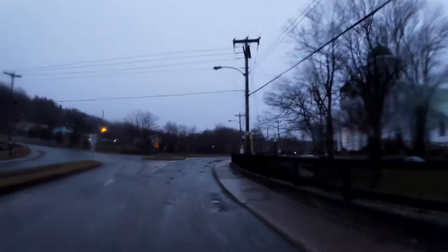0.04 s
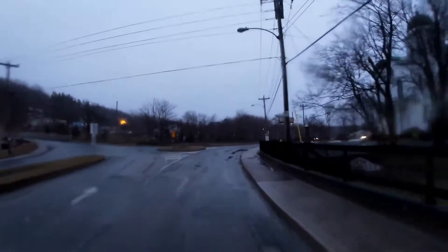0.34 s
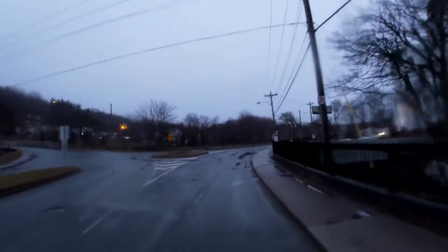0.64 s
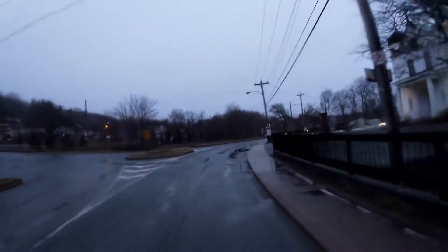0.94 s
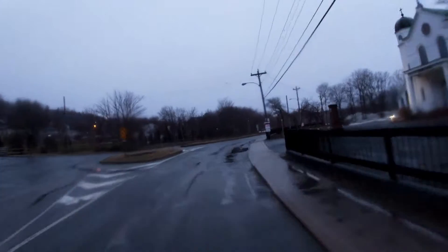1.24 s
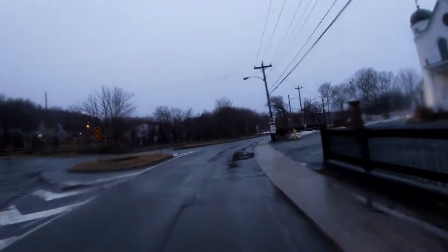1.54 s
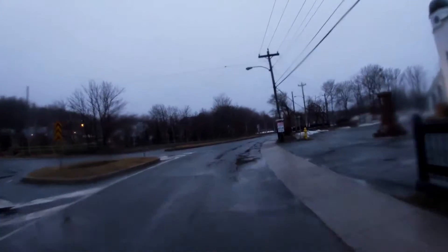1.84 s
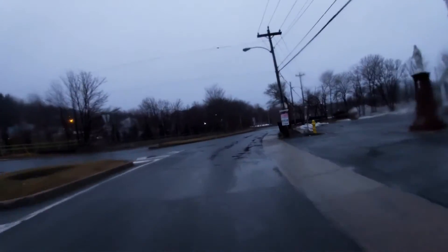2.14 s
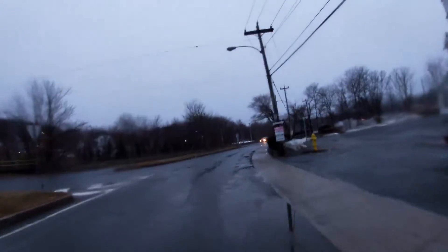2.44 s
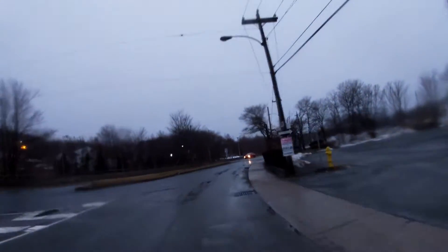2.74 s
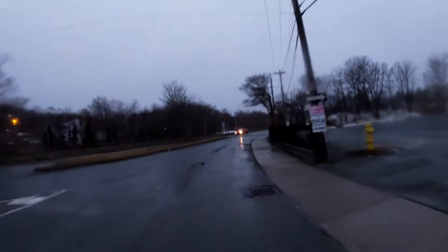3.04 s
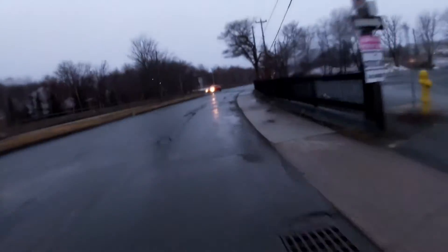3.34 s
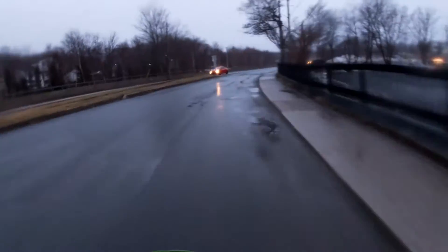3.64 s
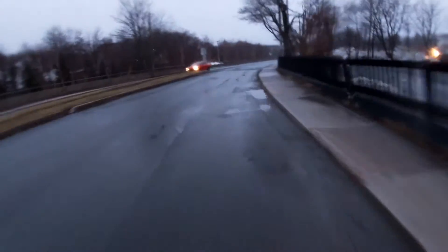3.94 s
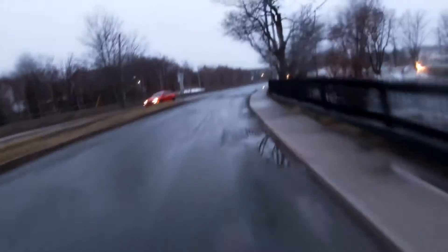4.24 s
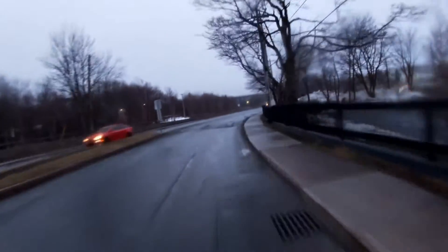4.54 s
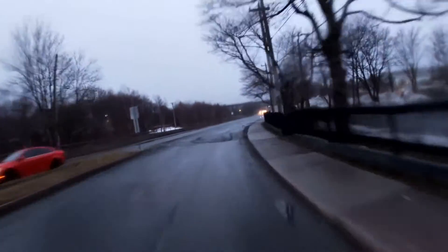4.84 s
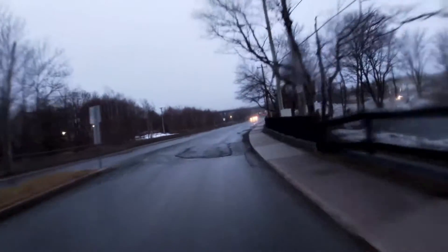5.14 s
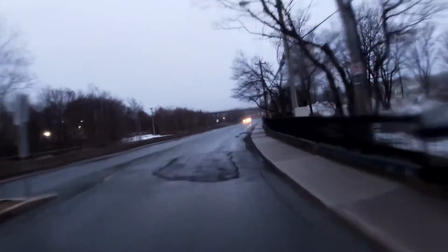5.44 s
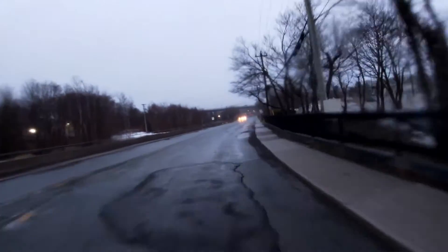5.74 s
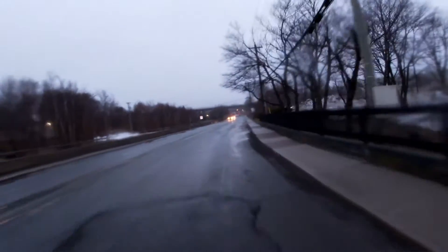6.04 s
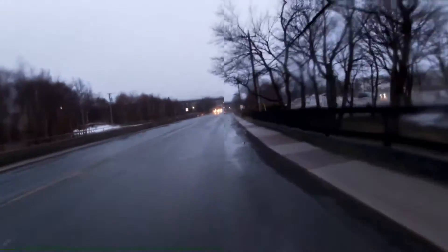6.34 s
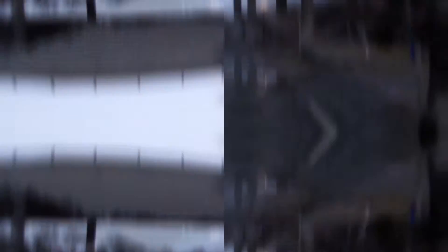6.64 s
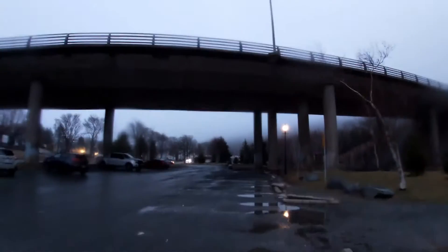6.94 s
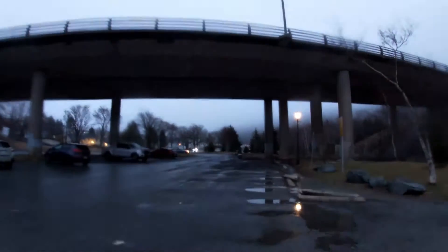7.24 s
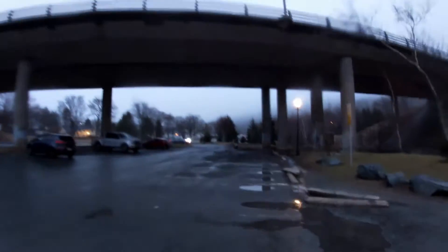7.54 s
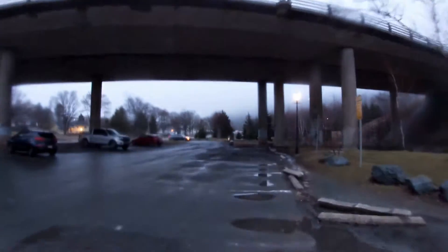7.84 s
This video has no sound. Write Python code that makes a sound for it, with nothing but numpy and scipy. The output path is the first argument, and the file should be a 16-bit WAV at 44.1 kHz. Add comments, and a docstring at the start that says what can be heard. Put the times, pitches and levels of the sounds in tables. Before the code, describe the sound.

A motorcycle engine drones along a wet road, heard from the rider's helmet under rumbling wind and tyre hiss. It coasts with a few soft pops, then pulls with a hollow, booming growl and metallic rattle before easing off. Occasional drops tap the helmet. Near the end the sound cuts abruptly to the engine chugging at a crawl, knocking and gradually speeding up, with less wind.

```python
"""A motorcycle engine drones under rushing wind, heard from the rider's helmet on a wet road.
It coasts, pulls, coasts and pulls again; then, abruptly, it is crawling along, chuffing once a cycle.
Firing pulses boom and ring in the intake and exhaust pipe, and the valves rattle the engine casing.
Tyre spray hisses, drops slap the helmet and air whistles faintly over its edge.
An automatic volume control pushes the wind back whenever the engine gets loud."""
import sys
import numpy as np
from scipy import signal
from scipy.fft import rfft, irfft, next_fast_len
from scipy.io import wavfile
from scipy.ndimage import uniform_filter1d

SR = 44100
rng = np.random.default_rng(int(sys.argv[2]) if len(sys.argv) > 2 else 0)


def output_pcm(signal):
    """Save a mono or channel-first signal as 16-bit PCM at the path in sys.argv[1].

    Samples are clipped to [-1, 1] before scaling.
    """
    pcm = np.clip(np.atleast_2d(signal).T, -1, 1) * 32767
    wavfile.write(sys.argv[1], SR, np.round(pcm).astype(np.int16))


N = 356324
TIME = np.arange(N) / SR
CRAWL_START_S = 6.68
ON_ROAD = TIME < CRAWL_START_S


def from_db(db):
    """Turn decibels into a number to multiply by."""
    return 10 ** (np.asarray(db) / 20)


def rms_one(x):
    """Scale a sound so its average strength (rms) is 1."""
    return x / np.sqrt(np.mean(x ** 2) + 1e-20)


def even(x):
    """Hold the strength near 1 over a few engine cycles, keeping the single beats."""
    power = uniform_filter1d(uniform_filter1d(x * x, size=SR // 7), size=SR // 7)
    return x / np.sqrt(np.abs(power) + 1e-20)


def curves(rows):
    """Join a table's timed points with straight lines, one curve for each value column."""
    times, *columns = np.transpose(rows)
    return [np.interp(TIME, times, column) for column in columns]


def drift(rate):
    """A smooth random wobble of size about 1 that changes about rate times a second."""
    r = np.exp(-80 * np.pi * rate / SR)
    slow = signal.lfilter([1], [1, -2 * r, r * r], rng.standard_normal(N // 40 + 2002))[2000:]
    return np.interp(np.arange(N) / 40, np.arange(len(slow)), rms_one(slow))


def noise(spectrum):
    """Noise of strength 1, coloured by a table and fading beyond its lowest and highest pitch."""
    hz, db = np.transpose(spectrum)
    size = next_fast_len(N)
    freqs = np.maximum(np.arange(size // 2 + 1) * SR / size, 1)
    ends = np.minimum(freqs / hz[0], 1) ** 2 * np.minimum(hz[-1] / freqs, 1) ** 2
    gain = from_db(np.interp(np.log(freqs), np.log(hz), db)) * ends
    return rms_one(irfft(rfft(rng.standard_normal(size)) * gain, size)[:N])


def resonate(x, modes):
    """Make a sound ring at each pitch in a table; a narrower width rings longer."""
    out = 0
    for hz, width, db in modes:
        r = np.exp(-np.pi * width / SR)
        poles = [1, -2 * r * np.cos(2 * np.pi * hz / SR), r * r]
        out = out + from_db(db) * (1 - r * r) / 2 * signal.lfilter([1, 0, -1], poles, x + 1e-18)
    return out


def band(x, low_hz, high_hz, order=8):
    """Keep what lies between two pitches."""
    return signal.sosfilt(signal.butter(order, [low_hz, high_hz], "band", fs=SR, output="sos"), x)


def cut_treble(x, top_hz, order):
    """Keep what lies below a pitch."""
    return signal.sosfilt(signal.butter(order, top_hz, fs=SR, output="sos"), x)


def swells_db(rows):
    """Smooth bumps and dips in level, each around its own moment."""
    return sum(db * np.exp(-((TIME - middle_s) / half_s) ** 2) for middle_s, half_s, db in rows)


def strikes(rows, rise_s):
    """The loudness of separate hits: each jumps up, then dies away."""
    shape = np.zeros(N)
    for start_s, db, decay_s in rows:
        start = int(start_s * SR)
        age = TIME[:N - start]
        fall = np.exp(-np.clip((age - rise_s) / decay_s, 0, 20))
        shape[start:] += from_db(db) * np.minimum(age / rise_s, 1) * fall
    return shape


# The colours of wind rumble, wind rush and tyre spray: pitch_hz, relative_db
RUMBLE_COLOUR = [(15, -3.5), (30, -7.5), (60, -2), (90, -4.5), (140, -7), (200, -18.5), (300, -27)]
RUSH_COLOUR = [(120, -10.5), (200, 9), (330, 8.5), (430, 4), (520, -1), (720, -4.5), (900, -10.5),
               (1350, -13.5), (2000, -23.5), (3000, -48), (5000, -59.5)]
SPRAY_COLOUR = [(1000, -7), (2000, 5), (3200, 3.5), (4300, -2), (5700, -3), (6300, -11), (6800, -21),
                (8000, -23.5), (9800, -23), (11000, -44.5), (13000, -54.5)]
# Gusts and lulls in the wind, and puddles that swell the spray: middle_s, half_length_s, change_db
GUSTS = [(0.022, 0.2, -3), (0.285, 0.065, 2.5), (.46, 0.024, 2.5), (1.86, 0.043, -4.5), (2.062, 0.064, 1),
         (2.506, 0.12, -3), (3.644, 0.18, -3), (5.084, 0.075, 2), (5.416, 0.23, 0.5), (6.209, 0.16, 0.2)]
PUDDLES = [(4.15, 0.36, 2.5), (4.517, .04, 5), (4.732, 0.23, 5), (5.91, 0.028, 4.5), (6.105, 0.035, 1)]
def wind_and_spray(speed_octaves):
    """Wind rumbles and swirls round the helmet, and tyres hiss; rush and hiss grow with speed."""
    wind_db = 11.5 * speed_octaves + swells_db(GUSTS)
    wet_db = swells_db(PUDDLES) - speed_octaves * ON_ROAD  # spray grows a little less than wind
    swirls = drift(29)
    rumble = from_db(np.where(ON_ROAD, -23.5, -24.5) + 2.4 * drift(14)) * noise(RUMBLE_COLOUR)
    rush_db = np.where(ON_ROAD, -26, -35) + wind_db + 1.3 * swirls
    rush = from_db(rush_db + 1.1 * drift(90) + 0.22 * drift(0.69)) * noise(RUSH_COLOUR)
    spray_db = np.where(ON_ROAD, -48.5, -54.5) + wind_db + wet_db + 0.65 * swirls
    spray = from_db(spray_db + 0.5 * drift(80)) * noise(SPRAY_COLOUR)
    return rumble + rush + spray


# The path of the helmet's whistle: time_s, pitch_hz, level_db
WHISTLE = [(.08, 6800, -81), (.17, 8000, -77), (1.15, 7480, -67), (1.47, 6800, -61), (1.7, 6930, -71.5),
           (2.6, 7030, -67.5), (3.2, 7500, -65.5), (3.42, 7200, -74), (3.56, 6670, -64), (3.75, 6700, -66),
           (4.0, 7670, -63.5), (4.25, 7060, -64), (4.4, 7650, -63), (4.5, 7400, -63), (4.6, 8140, -63),
           (4.85, 8200, -63), (4.97, 8600, -92), (5.25, 8350, -86), (5.55, 7950, -76), (5.72, 7360, -70),
           (5.88, 7250, -68), (5.93, 8000, -63), (6.0, 7400, -74), (6.15, 7200, -67), (6.3, 6660, -63),
           (6.4, 6720, -65), (6.46, 5930, -56), (6.56, 6000, -88)]
def whistle():
    """Air over an edge of the helmet makes two faint, breathy tones that wander close together."""
    pitch_hz, level_db = curves(WHISTLE)
    tones = 0
    for ratio, tone_db, wander_hz in [(1, -4, 49.8), (1.035, -7.5, 123.6)]:
        phase = 2 * np.pi * np.cumsum(ratio * pitch_hz + wander_hz * drift(14)) / SR
        breathy = drift(90) * np.cos(phase) + drift(90) * np.sin(phase)
        tones = tones + from_db(tone_db + 2.6 * drift(9)) * breathy
    return from_db(level_db) * tones


# Slaps on the helmet: start_s, level_db, decay_s
SLAPS = [(0.246, -30, .005), (0.299, -30, .005), (0.678, -24, .002), (0.886, -26, .0015),
         (0.925, -26, .0015), (1.394, -22, .002), (1.770, -22.5, .0025), (4.913, -26, .0025),
         (5.577, -24, .003), (5.897, -30, .004), (6.280, -27.5, .002)]
# Their dull colour: pitch_hz, relative_db
SLAP_COLOUR = [(400, -3), (700, 0), (1400, -3), (2200, -14), (4000, -28), (7000, -52)]
def slaps():
    """Drops and gusts hit the helmet with short, dull splashes."""
    return strikes(SLAPS, rise_s=.001) * noise(SLAP_COLOUR)


def burst(cycles, place, width, steepness):
    """A quick rise and slower fall once per engine cycle; place and width are shares of a cycle."""
    since = (cycles - place + .5) % 1 - .5
    return np.exp(-np.maximum(since, -steepness * since) / width)


# How the valves and the rattling casing ring: pitch_hz, width_hz, relative_db
VALVE_RINGS = [(1900, 400, 0.5), (3180, 400, -6.5), (5130, 420, -4)]
RATTLE_RINGS = [(1920, 170, 3.5), (2230, 81, -2.5), (2920, 130, -10), (5060, 400, -18)]
# How loud they are on the road: time_s, tick_db, rattle_db
CLATTER_LEVELS = [(2.4, -77, -80.5), (2.95, -56.5, -63), (3.4, -53, -60), (3.75, -58.5, -55.5),
                  (3.92, -62, -46.5), (4.3, -57, -43.5), (4.55, -48, -46), (4.75, -53, -47.5),
                  (5.0, -69, -74)]
def valve_ticks(cycles):
    """As the engine pulls, the valves tick once a cycle and the casing rattles between the ticks."""
    tick_db, rattle_db = curves(CLATTER_LEVELS)
    taps = (burst(cycles, .02, .05, 1.5) + .1) * rng.standard_normal(N)
    tick = rms_one(band(resonate(taps, VALVE_RINGS), 1500, 6230, order=3))
    tick *= from_db(tick_db + 1.5 * drift(30))
    hits = sum(strength * burst(cycles, place, .04, 2)
               for place, strength in [(-.06, 1), (.37, .25), (.6, .35)])
    rings = resonate((hits + .08) * rng.standard_normal(N), RATTLE_RINGS)
    return tick + from_db(rattle_db + 1.3 * drift(30)) * rms_one(band(rings, 1490, 6000, order=2))


# How the engine's metal casing rings: pitch_hz, width_hz, relative_db
CASING_RINGS = [(1618, 120, 15), (1850, 110, 11), (1947, 60, 12), (2390, 100, -4), (2864, 80, 10.5),
                (4660, 100, -13.5), (5560, 190, -5), (7650, 110, -10)]
def chuffs(cycles, throttle, climb):
    """Each cycle puffs gas, once strongly and once faintly, while valve clatter rings the casing."""
    width, steepness = np.where(ON_ROAD, 0.072, 0.058), np.where(ON_ROAD, 1.3, 3.3)
    puff = burst(cycles, .015, width, steepness) + 0.14 * burst(cycles, 0.52, width, steepness)
    hiss = gas_hiss(puff)
    hits = burst(cycles, -.008, width, steepness) + 0.16 * burst(cycles, 0.53, width, steepness)
    clatter = resonate((hits + 0.072) * rng.standard_normal(N), CASING_RINGS)
    casing_db = np.where(ON_ROAD, -22.5 + 8 * throttle, -14)
    casing = from_db(casing_db + 1.4 * drift(7.9)) * rms_one(band(clatter, 1340, 8200))
    level_db = np.where(ON_ROAD, -47.5 + 12 * np.sqrt(throttle), -39.5 + 19.2 * climb)
    return from_db(level_db) * (hiss + casing)


# The colour of a puff of gas: pitch_hz, relative_db
PUFF_COLOUR = [(600, -1.5), (1000, 5.5), (1800, 1), (3000, -9.5), (4500, -5.5), (5600, -3.5), (6800, -26.5),
               (8000, -20.5), (10000, -20.5), (11500, -38.5), (15000, -40.5)]
def gas_hiss(puff):
    """Escaping gas hisses with each puff, duller at road speed."""
    hiss = from_db(-4.5 + 1.3 * drift(5.7)) * (puff + 0.065) * noise(PUFF_COLOUR)
    return np.where(ON_ROAD, cut_treble(hiss, top_hz=8000, order=4), hiss)


# Hard knocks during the crawl: start_s, level_db
KNOCKS = [(6.757, -37), (6.846, -35), (6.933, -31), (7.019, -34), (7.102, -37), (7.333, -36), (7.482, -36),
          (7.625, -32), (7.695, -35), (7.764, -35), (7.832, -35), (8.029, -35)]
def knocks():
    """The labouring engine knocks: each brief rattle rings the casing."""
    decay_s = .002
    hits = strikes([(start_s, db, decay_s) for start_s, db in KNOCKS], rise_s=.0005)
    rings = resonate(hits * rng.standard_normal(N), CASING_RINGS)
    casing_gain = np.std(resonate(rng.standard_normal(N), CASING_RINGS))
    return band(rings, 500, 8500, order=4) / casing_gain


# The exhaust pipe's low notes: pitch_hz, width_hz, relative_db
PIPE_LOW_RINGS = [(223, 31, -2.5), (288, 60, -5.5), (343, 32, 1.5), (383.3, 16, -0.5)]
def pipe(gas):
    """The pipe rings on after each pulse of gas."""
    return band(resonate(gas, PIPE_LOW_RINGS), 174, 406, order=6)


# Single hard firings: start_s, peak_db
POPS = [(0.488, -17), (0.555, -18), (0.806, -17), (1.426, -18), (1.501, -18), (1.808, -17), (2.077, -14)]
def pops():
    """While the bike coasts, the fuel now and then fires hard and rings the pipe."""
    pulses = np.zeros(N)
    for start_s, db in POPS:
        pulses[int(start_s * SR)] = from_db(db)
    rings = pipe(pulses)
    return rings * pulses.max() / np.abs(rings).max()


def beats(cycles, place, uneven, spread_db, jitter_s):
    """One pulse per cycle; uneven burning scatters its strength and timing."""
    starts = np.flatnonzero(np.diff(np.floor(cycles - place)) == 1)
    chance = rng.standard_normal((len(starts), 2)) * uneven[starts, None]
    starts = starts + (chance[:, 0] * jitter_s * SR).astype(int)
    pulses = np.zeros(N)
    pulses[np.clip(starts, 0, N - 1)] = from_db(spread_db * chance[:, 1])
    return pulses


def firing(cycles, uneven, places, second_strength, turbulence):
    """Two unequal gas pulses in each cycle, with noisy, churning flow between them."""
    first = beats(cycles, places[0], uneven, spread_db=4.5, jitter_s=0.001)
    second = beats(cycles, places[1], uneven, spread_db=6.0, jitter_s=0.0012)
    return rms_one(first + second_strength * second) + turbulence * uneven * rng.standard_normal(N)


def octaves(revs):
    """How many doublings the engine speed is above its lowest value."""
    return np.log2(revs / revs.min())


# The exhaust pipe's high notes: pitch_hz, width_hz, relative_db
PIPE_HIGH_RINGS = [(657, 81, 1), (733, 53, -4)]
def rasp(cycles, uneven, throttle, revs):
    """With the throttle open, firings ring the pipe's high notes, harder as the engine speeds up."""
    gas = firing(cycles, uneven + .2, places=(.06, .5), second_strength=.5, turbulence=1.5)
    level = from_db(-56.5 + 81 * octaves(revs)) * np.sqrt(throttle)
    return level * even(band(resonate(gas, PIPE_HIGH_RINGS), 570, 850, order=3))


def gear_whine(cycles, throttle):
    """As the engine pulls, a gear tone climbs into the pipe's high notes."""
    tone = rms_one(np.cos(2 * np.pi * 22.25 * cycles))
    return from_db(-40) * throttle * resonate(tone, PIPE_HIGH_RINGS)


# The notes of the growl: pitch_hz, width_hz, relative_db
GROWL_RINGS = [(257.6, 22, -2.5), (308.3, 52, 4), (365.6, 16, -4.5)]
def growl(gas, throttle):
    """Gas pulses ring in a rough growl that stays even with the throttle shut."""
    return from_db(-28.5 + 9.5 * throttle) * even(band(resonate(gas, GROWL_RINGS), 205, 435.6))


def engine_tones(cycles, table, smear=0, flutter_db=0):
    """Tones at multiples of the cycle rate; smear delays each differently, as a duct does."""
    centre = np.mean([round(multiple) for multiple, _ in table])
    tones = 0
    for multiple, db in table:
        lag = np.pi * smear * (round(multiple) - centre) ** 2
        phase = 2 * np.pi * round(multiple) * cycles - lag
        tones = tones + from_db(db + flutter_db * drift(27)) * np.cos(phase)
    return rms_one(tones)


# The tones of the air intake: waves_per_cycle, relative_db
ROAR_TONES = [(9, 2), (10, -4), (11, 1.5), (12, -0.5), (13, -0.5), (14, 0.5)]
def intake_roar(cycles, throttle):
    """The air intake roars in fluttering tones as the throttle opens."""
    level = from_db(-14 + 0.86 * drift(45)) * throttle ** 2
    return level * engine_tones(cycles + .18, ROAR_TONES, smear=.18, flutter_db=1.5)


# When the pipe honks: start_s, end_s, rise_s, level_db
HONKS = [(0.75, 1.403, .3, -26.5), (2.016, 3.573, .29, -12.5), (6.26, 6.676, 0.2, -11.5)]
def honk_loudness(release_s=0.39):
    """Each honk builds, holds and dies back to a quiet hum."""
    level = from_db(-37.5)
    for start_s, end_s, rise_s, db in HONKS:
        rise = np.clip((TIME - start_s) / rise_s, 0, 1) ** 2
        fall = np.clip(1 - (TIME - end_s) / release_s, 0, 1)
        level = level + from_db(db) * rise * fall
    return level


# The tones of the honk: waves_per_cycle, relative_db
HONK_TONES = [(13, -6.5), (14, 4), (15, -25), (16, -5), (17, -24.5), (26, -24)]
def honk(cycles, uneven, honk_level):
    """The pipe honks as the engine drives its natural note; uneven firing makes it waver."""
    waver = from_db((-0.75 + 4.2 * uneven) * drift(54))
    return honk_level * waver * engine_tones(cycles - .07, HONK_TONES, flutter_db=.6)


# The engine's deep tones on the road: waves_per_cycle, relative_db
BOOM_TONES = [(1, -29.5), (2, -16), (3, -17), (4, 3), (5, -12), (6, -23.5), (7, -15.5), (8, -18)]
def boom(cycles, uneven, throttle, honk_level):
    """Fast firings blend into a deep boom that swells with the throttle and the honk."""
    level = from_db(-25 + 10.5 * throttle) + 0.12 * honk_level
    return level * from_db(2.0 * uneven * drift(48)) * engine_tones(cycles - .08, BOOM_TONES)


def road_engine(cycles, throttle, revs):
    """At road speed the engine fires smoothly when pulling, unevenly with dull thumps when coasting."""
    uneven_open, uneven_shut = 0.06, 0.62
    uneven = uneven_open + (uneven_shut - uneven_open) * (1 - throttle) ** 0.87
    gas = firing(cycles, uneven, places=(-.22, .36), second_strength=.7, turbulence=.8)
    # The chain tugs once per wheel turn, and uneven firing makes the engine's speed sway.
    wheel_turns = .287 * cycles
    swaying = cycles + .005 * np.sin(2 * np.pi * wheel_turns) + (.002 + .014 * uneven) * drift(8)
    honk_level = honk_loudness()
    thump = from_db(-22) * uneven * even(band(resonate(gas, [(88.6, 27, 0)]), 43, 169))
    return (intake_roar(swaying, throttle) + growl(gas, throttle) + gear_whine(swaying, throttle)
            + honk(swaying, uneven, honk_level) + boom(swaying, uneven, throttle, honk_level)
            + rasp(cycles, uneven, throttle, revs) + thump)


# The engine's deep tones at a crawl: waves_per_cycle, relative_db
THROB_TONES = [(1, -28), (2, -26), (3, -30), (4, 1), (5, -6), (6, -6.5), (7, -5.5), (8, -6.5), (9, -11),
               (10, -21)]
def crawling_engine(cycles, climb):
    """Slow firings are separate ringing putts over a deep throb; both grow as the engine speeds up."""
    putt_db, throb_db = -24.5 + 11.9 * climb, -21.5 + 14.2 * climb
    uneven = np.full(N, 0.26)
    gas = firing(cycles, uneven, places=(-.03, .49), second_strength=.9, turbulence=1.1)
    putts = from_db(putt_db) * even(pipe(gas))
    # Mostly the first pulse is sharp enough to ring the pipe's high notes.
    crack = firing(cycles, uneven, places=(-.015, .51), second_strength=.5, turbulence=1.3)
    ring = from_db(putt_db - 20) * even(band(resonate(crack, PIPE_HIGH_RINGS), 583, 850, order=3))
    throb = sum(from_db(db) * np.cos(2 * np.pi * round(multiple) * cycles + rng.uniform(0, 2 * np.pi))
                for multiple, db in THROB_TONES)
    return putts + ring + from_db(throb_db + .5 * drift(15)) * rms_one(throb)


def count_cycles(road_revs, crawl_revs):
    """Count the engine's cycles so far: the clock that keeps its parts in step."""
    road = np.cumsum(road_revs) / SR + .03
    crawl = np.cumsum(crawl_revs * ~ON_ROAD) / SR + .15
    return np.where(ON_ROAD, road, crawl)


# Engine speed on the road and at a crawl: time_s, cycles_per_s
ROAD_REVS = [(0, 29.239), (0.6, 27.866), (0.95, 27.787), (1.75, 26.092), (2.65, 25.509), (3.45, 26.232),
             (4.05, 27.578), (4.75, 29.737), (5.4, 28.166), (5.95, 26.48), (6.3, 26.341), (6.68, 25.43)]
CRAWL_REVS = [(6.68, 11.12), (6.95, 11.5), (7.25, 13.07), (7.6, 14.03), (7.9, 15.27), (8.08, 15.21)]
# How far the rider opens the throttle on the road: time_s, opening (0 shut, 1 full)
THROTTLE = [(0, .05), (1.0, 0.1), (1.9, 0), (2.35, 0.48), (3.3, 0.61), (3.72, 0.8), (3.9, 1), (4.45, 0.95),
            (4.83, 0.43), (5.02, 0), (6.25, 0.06), (6.45, 0.2), (6.68, 0.5)]
def scene():
    """Engine and air at the helmet; the sound dips for an instant where the ride cuts to the crawl."""
    road_revs, crawl_revs = curves(ROAD_REVS)[0], curves(CRAWL_REVS)[0]
    cycles = count_cycles(road_revs, crawl_revs)
    throttle = np.clip(curves(THROTTLE)[0], 0, 1)
    climb = octaves(crawl_revs)
    riding = road_engine(cycles, throttle, road_revs) + valve_ticks(cycles)
    engine = np.where(ON_ROAD, riding, crawling_engine(cycles, climb)) + pops() + knocks()
    # In one gear the bike's speed follows the engine's; zero here is about average.
    road_speed, crawl_speed = np.log2(road_revs / road_revs.mean()), climb - climb[~ON_ROAD].mean()
    air = wind_and_spray(np.where(ON_ROAD, road_speed, crawl_speed)) + ON_ROAD * whistle() + slaps()
    dip = 1 - np.exp(-((TIME - CRAWL_START_S) / .004) ** 2)
    return (dip * (engine + chuffs(cycles, throttle, climb) + air))[None]


def volume_control(x, threshold_db=-24, slope=0.66, response_s=0.018, boost_db=2.0):
    """Turn the volume down as the sound grows, so a loud engine pushes the wind back."""
    r = np.exp(-1 / (response_s * SR))
    power = signal.lfilter([1 - r], [1, -r], x ** 2, zi=[np.mean(x[:SR // 4] ** 2)])[0]
    over_db = np.maximum(10 * np.log10(power + 1e-12) - threshold_db, 0)
    return x * from_db(boost_db - slope * over_db)


def record(dry, ceiling=0.6):
    """Control the volume of ride and crawl separately, round the peaks and cut the highest treble."""
    parts = np.split(dry[0], [int(CRAWL_START_S * SR)])
    held = np.concatenate([volume_control(part) for part in parts])[None]
    rounded = held / (1 + (held / ceiling) ** 4) ** (1 / 4)
    return cut_treble(rounded, top_hz=15200, order=14)


dry = scene()
out = record(dry)
output_pcm(out)
```